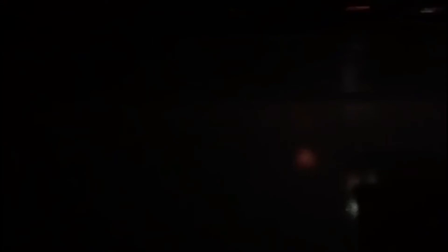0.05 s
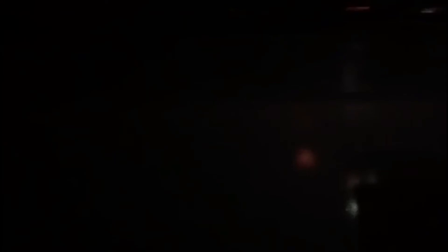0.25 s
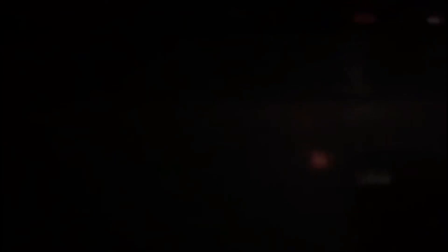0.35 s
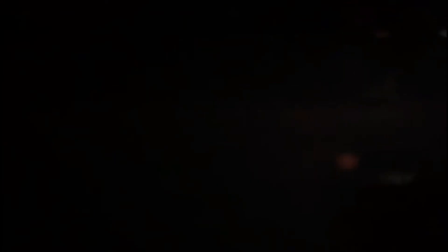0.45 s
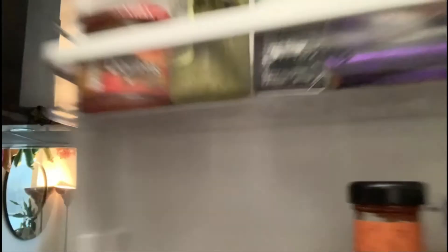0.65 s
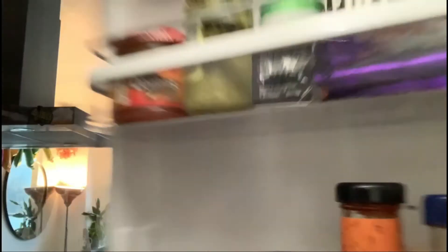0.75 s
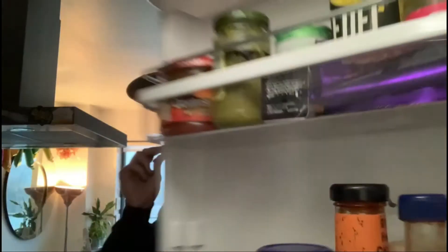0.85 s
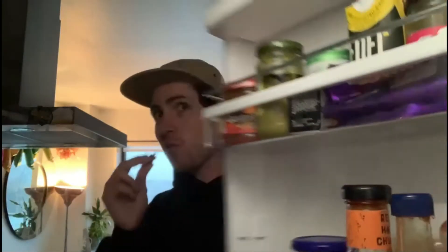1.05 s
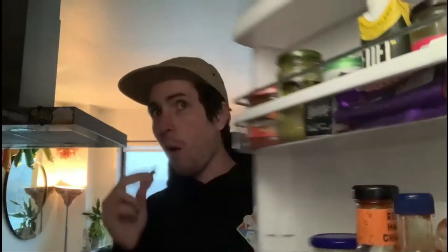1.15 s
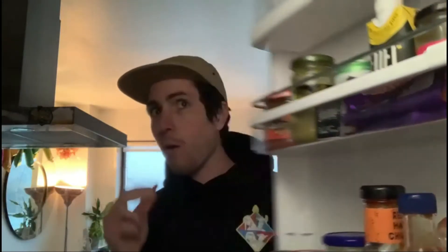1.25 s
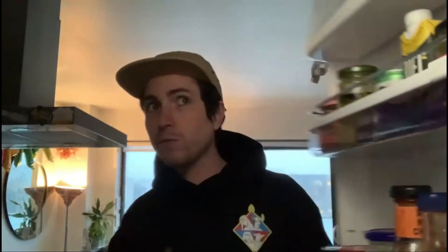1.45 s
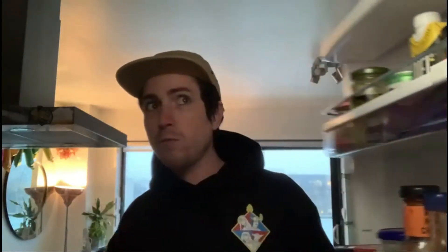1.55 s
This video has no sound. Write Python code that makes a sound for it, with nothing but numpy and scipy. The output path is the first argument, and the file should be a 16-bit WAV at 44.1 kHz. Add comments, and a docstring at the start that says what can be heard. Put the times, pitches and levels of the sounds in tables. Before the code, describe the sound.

Fridge door yanked open close to a microphone inside the boxy cabinet; its magnetic seal snaps loose with a hollow thud, the hinge chirps briefly, then light rattles fade into faint room air and compressor hum.

```python
"""Inside a refrigerator: the handle is gripped and the magnetic seal peels off with a crackling thump.
Dense cracks and single snaps ring the door liner, and knocks and low jolts shake door and shelf.
The hinge squeaks in a climbing tone with overtones; jars and fingers tap as dying noise bursts.
Behind them are swelling hiss for the kitchen air, a steady rumble, and a compressor hum of sine tones."""
import sys
import numpy as np
from scipy import signal
from scipy.fft import rfft, irfft, next_fast_len
from scipy.io import wavfile

SR = 44100
rng = np.random.default_rng(int(sys.argv[2]) if len(sys.argv) > 2 else 0)


def magnitude_from_level(level_db):
    """Linear magnitude for a level in decibels (20 dB per decade)."""
    exponent = np.asarray(level_db, float) / 20
    return 10 ** exponent


def inscribe(sig):
    """Save sig as 16-bit PCM at rate SR to the path in sys.argv[1].

    A 1-D sig is mono; a 2-D sig holds one channel per row.
    Samples are clipped to [-1, 1] before scaling.
    """
    pcm = np.round(np.clip(np.atleast_2d(sig).T, -1, 1) * 32767)
    wavfile.write(sys.argv[1], SR, pcm.astype(np.int16))


N = 70560  # length [samples]

# All levels below are relative; t60 is the time a sound takes to die away by 60 dB.
# Crackle of the peeling seal: (time [s], level [dB])
PEEL_LEVEL = [(0.16, -78), (0.188, -33.5), (0.208, -39.5), (0.218, -13.5), (0.23, -20), (0.252, -21.5),
              (0.28, -52.5), (0.348, -61), (0.36, -68)]
# Tone colour of the crackle: (frequency [Hz], level per Hz [dB])
PEEL_SPECTRUM = [(210, -44), (350, -2), (600, 2.5), (1050, -5), (1470, -2.5), (2260, -8), (2820, -13),
                 (6400, -19), (8000, -24), (10200, -15.5), (11500, -24), (13000, -60)]
# Ringing modes of the door liner: (frequency [Hz], level [dB], t60 [s])
LINER_MODES = [(752, 6, 0.21), (863, -19.5, 0.076), (989, 1, 0.093), (1126, 6.5, 0.032), (1393, -1, 0.07),
               (1593, -9, 0.033), (1682, 4, .055), (2230, -14, 0.03), (2500, -23.5, 0.04)]
# Single snaps as stretches of seal let go: (time [s], level [dB], pitch [Hz], t60 [s])
SEAL_SNAPS = [(0.182, -29.5, 977, 0.026), (0.219, -4, 1655, 0.015), (0.232, -18.5, 1097, 0.026),
              (0.2469, -4, 2230, 0.011), (0.249, -5.5, 1039, 0.021), (0.267, -18.5, 759, 0.036)]
# Knocks on the hollow door panel as the seal lets go: (time [s], level [dB])
DOOR_KNOCKS = [(0.182, -21), (.233, -18), (0.268, -28)]
# Low jolts through door and shelf: (time [s], level [dB], pitch [Hz], t60 [s])
LOW_JOLTS = [(0.228, 0.5, 60, 0.028), (0.276, -8, 121.7, 0.03), (0.251, -6, 55.8, 0.14),
             (0.283, -13.5, 59.5, 0.084), (0.302, -10, 45.8, 0.086), (0.374, -18.5, 56.5, 0.17),
             (0.408, -27, 59.5, 0.19), (0.453, -18, 51.7, 0.15), (0.513, -18, 52.3, 0.19),
             (0.544, -20.5, 45.2, 0.29), (0.601, -21.5, 66, 0.076), (0.645, -23, 46.3, 0.15),
             (0.734, -24.5, 66, 0.12), (0.781, -24, 62.8, 0.064), (0.876, -26, 70, 0.08),
             (1.182, -32.5, 74, 0.18)]
# Hinge squeak: (time [s], fundamental [dB], second [dB], third [dB], fourth harmonic [dB])
SQUEAK_LEVELS = [(.35, -56, -89, -84, -91), (.364, -35.5, -51.5, -76, -83.5),
                 (.378, -29.5, -39.5, -64, -72), (.394, -36.5, -46.5, -80.5, -69),
                 (.41, -34, -40.5, -63.5, -63.5), (.423, -31, -35.5, -59, -58),
                 (.433, -31, -53, -63.5, -52.5), (.443, -33.5, -35.5, -58, -68),
                 (.462, -39, -38.5, -73, -77), (.49, -47, -73, -99, -100), (.52, -53.5, -95, -100, -100)]
# Squeak pitch, climbing as the hinge speeds up: (time [s], fundamental [Hz])
SQUEAK_HZ = [(.345, 812), (.368, 831), (.38, 833), (.394, 853), (.434, 855), (.452, 864), (.53, 868)]
# Thin whine after the squeak: (start [s], end [s], start pitch [Hz], end pitch [Hz], level [dB])
THIN_WHINE = (.48, .6, 1440, 1620, -57)
# Taps of fingers and jars: (time [s], level [dB], pitch [Hz], t60 [s], bright edge against body [dB])
JAR_TAPS = [(0.632, -49, 1190, 0.24, -12), (0.8415, -36, 1400, .035, -5), (0.845, -29, 680, 0.05, -30),
            (0.856, -42, 1200, 0.45, -14), (0.91, -51, 1320, 0.05, -32), (1.194, -44, 900, 0.09, -22),
            (1.242, -49, 800, 0.13, -8), (1.255, -51, 1030, 0.07, -12), (1.481, -56, 880, 0.16, -20)]
# Fingertip ticks on the handle: (time [s], level [dB])
GRIP_TICKS = [(0.115, -53.5), (0.125, -54), (0.138, -56.5)]
# Narrow bands in each fingertip tick: (frequency [Hz], level [dB])
GRIP_SPECTRUM = [(950, -1), (3800, -8), (5250, 1), (6700, -5), (8500, -3), (10500, -6)]
# Kitchen air and door swish: (time [s], mids [dB], treble [dB], top [dB])
AIR_LEVELS = [ [(0.0, -68, -85, -95), (0.11, -63.5, -84.5, -80), (0.182, -49, -64, -89.5),
              (0.244, -33, -50, -96), (0.316, -55.5, -86.5, -87.5), (0.4, -59, -77, -90),
              (0.5, -55, -74.5, -118.5), (0.646, -54, -64.5, -67), (0.788, -53, -65, -81.5),
              (0.944, -55, -69, -89), (1.132, -58.5, -70.5, -88), (1.274, -59, -66.5, -76),
              (1.466, -61.5, -82, -100.5), (1.6, -59.5, -75.5, -91)], ][0]
# Tone colour of the air: (frequency [Hz], level per Hz [dB])
AIR_SPECTRUM = [(380, -23.5), (550, -17.5), (752, -1.5), (954, -9), (1540, -13.5), (2080, -18), (4770, -19),
                (6400, -23), (7400, -52.5)]
# Tone colour of the steady rumble: (frequency [Hz], level per Hz [dB])
RUMBLE_SPECTRUM = [(15, -36), (25, 4.5), (57, -11), (75, -24.5), (96, 6), (151, -6), (172, -20), (199, -7),
                   (600, -4), (780, -98), (1320, -120)]
# How alike left and right noise are: (frequency [Hz], likeness [1 = the same])
STEREO_LIKENESS = [(40, .99), (150, .85), (330, .6), (450, .995), (640, .995), (900, .6), (5000, .7),
                   (7000, .99)]
# Compressor hum: (multiple of mains [count], door shut [dB], door open [dB])
HUM_TONES = [(1, -35.5, -43.5), (2, -42, -53), (3, -64.5, -53), (4, -56.5, -60)]
# Sixth mains multiple, coming and going as the door turns: (time [s], level [dB])
SIXTH_LEVEL = [(0.0, -91), (0.164, -49.5), (0.44, -61.5), (1.086, -53), (1.172, -71), (1.416, -58.5),
               (1.6, -65)]
# Left microphone port against the right: (frequency [Hz], phase [half turns], level [dB])
PORT_DIFFERENCE = [(0, 0, 0), (150, -.15, .5), (430, -.95, 0), (630, -1, 0), (900, -.5, 4), (1500, -.55, 4),
                   (2300, -1.5, 3), (3500, -1.9, 1), (5500, -2.3, 0), (6900, -3, 0), (9600, -3, 0),
                   (10500, -3.9, -2), (13000, -3.9, -2)]


def rms_one(x):
    """Scales a sound to an average strength (rms) of 1."""
    return x / np.sqrt(np.mean(x ** 2) + 1e-20)


def in_time(rows):
    """Draws straight lines between table rows, giving each column a value at every sample."""
    s, *columns = np.transpose(rows)
    return [np.interp(np.arange(N) / SR, s, c) for c in columns]


def at_hz(points, hz):
    """Reads a table at a frequency, on a logarithmic frequency scale."""
    table = np.array(points)
    return np.interp(np.log(hz), np.log(table[:, 0]), table[:, 1])


def drift(rate_hz):
    """Random wander of spread 1: noise smoothed twice, faster at a higher rate."""
    r = np.exp(-2 * np.pi * rate_hz / SR)
    wander = signal.lfilter([1], [1, -2 * r, r * r], rng.standard_normal(2 * N))
    return rms_one(wander[N:])  # skip the filter's start


def band_pass(x, order, low_hz, high_hz):
    """Keeps only the sound between two frequencies."""
    return signal.sosfilt(signal.butter(order, [low_hz, high_hz], "band", fs=SR, output="sos"), x)


def low_pass(x, order, hz):
    """Takes away the sound above a frequency."""
    return signal.sosfilt(signal.butter(order, hz, fs=SR, output="sos"), x)


def ring(x, hz, t60):
    """A resonance: a unit click sets off a dying sine of starting height 1."""
    r = magnitude_from_level(-60 / (t60 * SR))
    w = 2 * np.pi * hz / SR
    return signal.lfilter([0, np.sin(w)], [1, -2 * r * np.cos(w), r * r], x + 1e-18)


def click(s, db):
    """A single-sample click, used to start a ringing."""
    out = np.zeros(N)
    out[int(s * SR)] = magnitude_from_level(db)
    return out


def bands(x, spectrum):
    """Splits noise into third-octave bands, taking its rows in turn, and sets each band's level."""
    edges = 25 * 2 ** np.arange(0, 9.1, 1 / 3)
    for k, (low, high) in enumerate(zip(edges, edges[1:])):
        hz = np.sqrt(low * high)
        if spectrum[0][0] < hz < spectrum[-1][0]:
            yield hz, magnitude_from_level(at_hz(spectrum, hz)) * band_pass(x[k % len(x)], 2, low, high)


def stereo_noise(spectrum):
    """Mixes a shared and an opposite noise in each band, so left and right are partly alike."""
    for hz, (mid, side) in bands(rng.standard_normal((2, 2, N)), spectrum):
        alike = np.clip(at_hz(STEREO_LIKENESS, hz), -1, 1)
        yield hz, np.sqrt(1 + alike) * mid + np.sqrt(1 - alike) * side * [[1], [-1]]


def seal():
    """Rubber letting go: dense random cracks, heard directly and through the liner's ringing modes."""
    CRACKS_PER_S, CRACK_SPREAD_DB = 2800, 2.5
    DIRECT_DB, LINER_DB = -7, -7
    fade_in = [(PEEL_LEVEL[0][0] - .02, -90)]
    fade_out = [(PEEL_LEVEL[-1][0] + 0.024, -90)]
    db, = in_time(fade_in + list(PEEL_LEVEL) + fade_out)
    size = magnitude_from_level(CRACK_SPREAD_DB * np.minimum(rng.exponential(1, (2, N)), 4))
    sign = rng.choice([-1, 1], (2, N))
    happens = rng.random((2, N)) < CRACKS_PER_S / SR
    cracks = size * sign * happens
    direct = rms_one(sum(band for _, band in bands(cracks, PEEL_SPECTRUM))) * magnitude_from_level(db)
    # Strength of the liner under unbroken crackle, for setting its level
    scale = np.std(sum(magnitude_from_level(g) * ring(cracks[0], hz, t60) for hz, g, t60 in LINER_MODES))
    liner = sum(magnitude_from_level(g) * ring(cracks[k % 2] * magnitude_from_level(db), hz, t60)
                for k, (hz, g, t60) in enumerate(LINER_MODES)) / scale
    return magnitude_from_level(DIRECT_DB) * direct + magnitude_from_level(LINER_DB) * liner


def snaps():
    """Each stretch of seal letting go rings briefly at its own pitch, with a soft start."""
    RISE_S = 0.002
    t = np.arange(N) / SR
    return sum(ring(click(s, db), hz, t60) * np.clip((t - s) / RISE_S, 0, 1)
               for s, db, hz, t60 in SEAL_SNAPS)


def panel():
    """The hollow door booms at one pitch, swelling in and dying away after each knock."""
    PITCH_HZ, T60_S, RISE_S = 277, .145, .011
    t = np.arange(N) / SR
    swell = 0
    for s, db in DOOR_KNOCKS:
        since = np.maximum(t - s, 0)
        swell = swell + magnitude_from_level(db - 60 * since / T60_S) * (1 - np.exp(-since / RISE_S))
    return 2 * swell * np.sin(2 * np.pi * PITCH_HZ * t)


def jolts():
    """Each soft push sets a low resonance and an overtone ringing; the overtone dies twice as fast."""
    RISE_S, OVERTONE_RATIO, OVERTONE_DB = .004, 2.2, -5
    r = np.exp(-1 / (RISE_S * SR))
    out = 0
    for s, db, hz, t60 in LOW_JOLTS:
        push = signal.lfilter([1 - r], [1, -r], click(s, db))
        out = out + 2 * ring(push, hz, t60)
        out = out + 2 * magnitude_from_level(OVERTONE_DB) * ring(push, hz * OVERTONE_RATIO, t60 / 2)
    return out


def squeak():
    """The hinge sticks and slips: a rough climbing tone with six harmonics, then a thin whine."""
    UPPER_FALL_DB, ROUGH_DB = 13, 2.2
    t = np.arange(N) / SR
    hz, = in_time(SQUEAK_HZ)
    levels = in_time(SQUEAK_LEVELS)
    # The fifth and sixth harmonics follow the fourth, more softly
    levels = levels + [levels[-1] - UPPER_FALL_DB * k for k in range(1, 3)]
    on = (t > SQUEAK_LEVELS[0][0]) & (t < SQUEAK_LEVELS[-1][0])
    phase = 2 * np.pi * np.cumsum(hz) / SR
    tone = sum(magnitude_from_level(db + ROUGH_DB * drift(60)) * np.cos(k * phase) for k, db in enumerate(levels, 1))
    start, end, start_hz, end_hz, db = THIN_WHINE
    share = np.clip((t - start) / (end - start), 0, 1)
    whine_hz = start_hz + (end_hz - start_hz) * share + 60 * drift(150)
    whine_level = magnitude_from_level(db + 4 * drift(40)) * np.sin(np.pi * share)
    whine = whine_level * np.sin(2 * np.pi * np.cumsum(whine_hz) / SR)
    return np.sqrt(2) * on * tone + whine


def taps():
    """Fingers and jars: each tap is a dying noise burst in a broad resonance plus a bright edge."""
    LEVEL_DB, WIDTH, RISE_S = -9, .4, .002
    GRAIN_DB, EDGE_DB = 1.5, 9
    t = np.arange(N) / SR
    out = 0
    bright = band_pass(rng.standard_normal(N), 3, 1500, 3000)
    white = low_pass(rng.standard_normal(N), 2, 6000) * magnitude_from_level(GRAIN_DB * drift(200))
    edge = rms_one(bright) + magnitude_from_level(EDGE_DB) * white
    for s, db, hz, t60, bright_db in JAR_TAPS:
        body = band_pass(white, 2, hz * (1 - WIDTH), hz * (1 + 2 * WIDTH))
        since = np.maximum(t - s, 0)
        envelope = magnitude_from_level(db + LEVEL_DB - 60 * since / t60) * np.minimum(since / RISE_S, 1)
        out = out + envelope * (rms_one(body) + magnitude_from_level(bright_db) * edge)
    return out


def grip():
    """Sticky fingertips on the handle tick as narrow bands of noise that die fast."""
    T60_S, RISE_S = .07, .004
    t = np.arange(N) / SR
    envelope = sum(magnitude_from_level(db - 60 * np.maximum(t - s, 0) / T60_S) * np.clip((t - s) / RISE_S, 0, 1)
                   for s, db in GRIP_TICKS)
    noise = sum(magnitude_from_level(db) * rms_one(ring(rng.standard_normal(N), hz, 25.0 / hz))
                for hz, db in GRIP_SPECTRUM)
    return envelope * noise


def cabinet(x):
    """The plastic box answers with short dense echoes, different at each port."""
    T60_S, LEVEL_DB = .11, -3.5
    t = np.arange(int(.3 * SR)) / SR
    tail = rng.standard_normal((2, len(t))) * magnitude_from_level(-60 * t / T60_S)
    tail = tail / np.sqrt(np.sum(tail ** 2, axis=1, keepdims=True))
    upper = band_pass(x, 2, 200, 4000)
    return magnitude_from_level(LEVEL_DB) * signal.fftconvolve(upper[None], tail, axes=1)[:, :N]


def air():
    """Hiss swells as the door lets the kitchen in, over a steady rumble; its bands flicker."""
    LEVEL_DB, TOP_DB, RUMBLE_DB = 1.5, 4, -46.5
    FLICKER_DB, PATCHY_DB = 1.4, 1.3  # flicker shared by all bands, patchiness of each band
    mids, treble, top = in_time(AIR_LEVELS)
    low, high = 0, 0
    flicker = FLICKER_DB * drift(60)
    for hz, band in stereo_noise(AIR_SPECTRUM):
        band = band * magnitude_from_level(PATCHY_DB * drift(6.4) + flicker)
        if hz < 2500:
            low = low + band
        else:
            high = high + band
    hiss = magnitude_from_level(LEVEL_DB) * (magnitude_from_level(mids) * rms_one(low) + magnitude_from_level(treble) * rms_one(high))
    rumble = rms_one(sum(band for _, band in stereo_noise(RUMBLE_SPECTRUM)))
    sheen = rms_one(band_pass(rng.standard_normal(N), 4, 6900, 11800))
    return ports(hiss + magnitude_from_level(RUMBLE_DB) * rumble) + ports([magnitude_from_level(top + TOP_DB) * sheen] * 2)


def hum():
    """The compressor sounds multiples of the mains; their balance shifts as the door swings open."""
    MAINS_HZ, WAVER_DB = 50.27, 1.0
    DOOR_OPENS_S, SWING_S = .3, .3
    t = np.arange(N) / SR
    opened = np.clip((t - DOOR_OPENS_S) / SWING_S, 0, 1)
    levels = [(k, shut + (wide - shut) * opened) for k, shut, wide in HUM_TONES]
    levels.append((6, in_time(SIXTH_LEVEL)[0]))
    out = 0
    for k, db in levels:
        tone = np.sin(2 * np.pi * (k * MAINS_HZ * t + rng.random()))
        out = out + np.sqrt(2) * magnitude_from_level(db + WAVER_DB * drift(3.7)) * tone
    return out


def place(x, lag_s, pan_db):
    """Puts a sound to one side: the left port hears it a little later, at a different level."""
    n = np.arange(N)
    late = np.interp(n - lag_s * SR, n, x)
    return np.array([late * magnitude_from_level(pan_db / 2), x * magnitude_from_level(-pan_db / 2)])


def ports(pair):
    """The two microphone ports differ in phase and level; the left one is turned and scaled."""
    size = next_fast_len(N + 4096)
    hz, turn, db = np.transpose(PORT_DIFFERENCE)
    grid = np.arange(size // 2 + 1) * SR / size
    gain = magnitude_from_level(np.interp(grid, hz, db))
    rotation = np.exp(1j * np.pi * np.interp(grid, hz, turn))
    left = irfft(rfft(pair[0], size) * gain * rotation, size)[:N]
    return np.array([left, pair[1]])


def scene():
    """Adds the door's sounds, their echoes and the background as heard at the two ports."""
    near = seal() + snaps() + taps() + grip()
    direct = ports([near + squeak()] * 2)
    boom = place(panel(), 0.00098, 0.1)
    lows = place(hum() + jolts(), .00005, 0.38)
    return direct + boom + cabinet(near) + lows + air()


def top_cut(x):
    """Nothing passes above the cut-off."""
    return signal.sosfilt(signal.butter(12, 12350, fs=SR, output="sos"), x)


def record(dry):
    """The microphone cuts the deepest bass and the very top."""
    LOW_CUT_HZ, TOP_HZ = 48.6, 11900
    low_cut = signal.sosfilt(signal.butter(3, LOW_CUT_HZ, "high", fs=SR, output="sos"), dry)
    mix = low_pass(low_cut, 8, TOP_HZ)
    return top_cut(mix)


dry = scene()
out = record(dry)
inscribe(out)
```